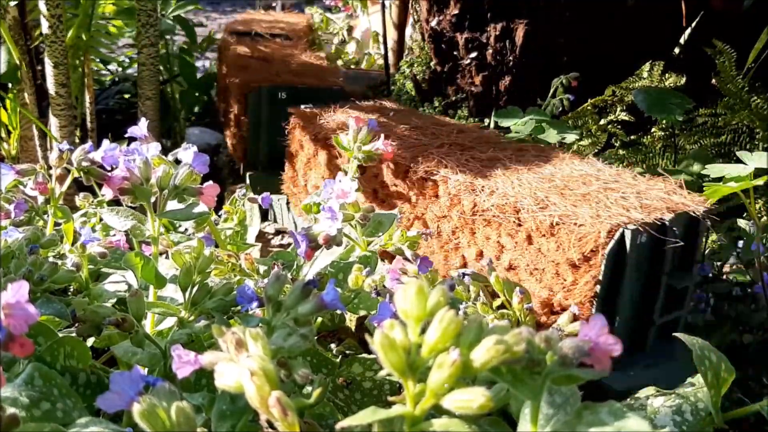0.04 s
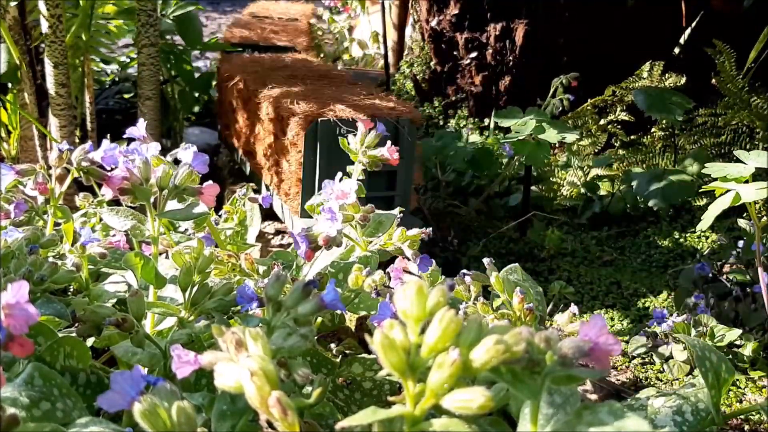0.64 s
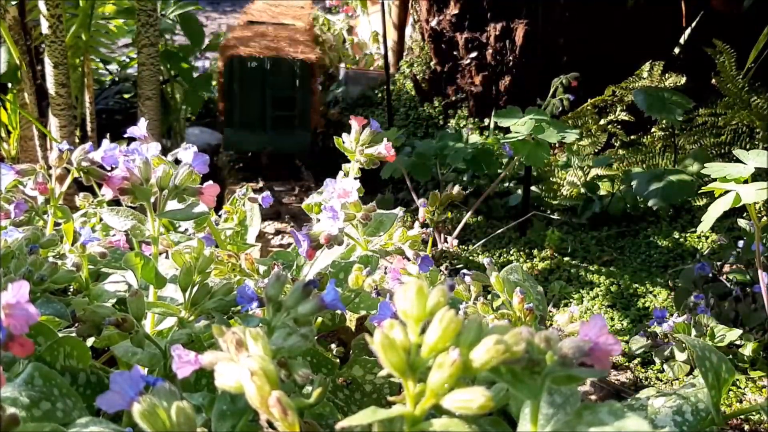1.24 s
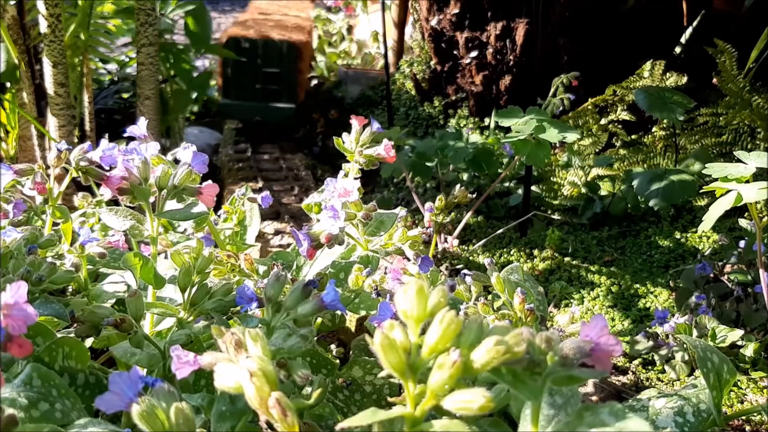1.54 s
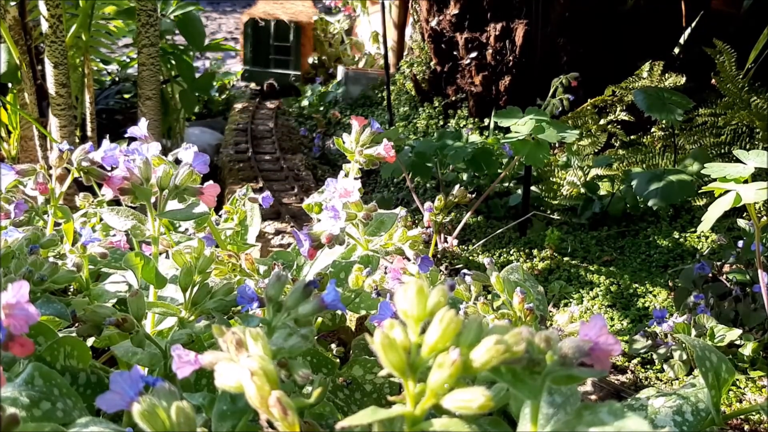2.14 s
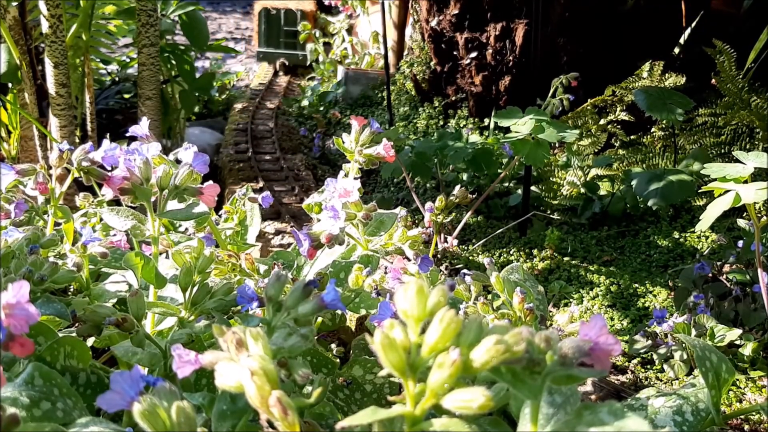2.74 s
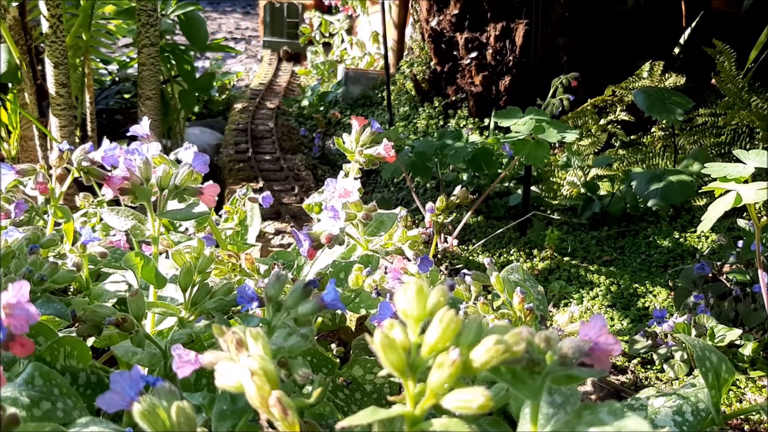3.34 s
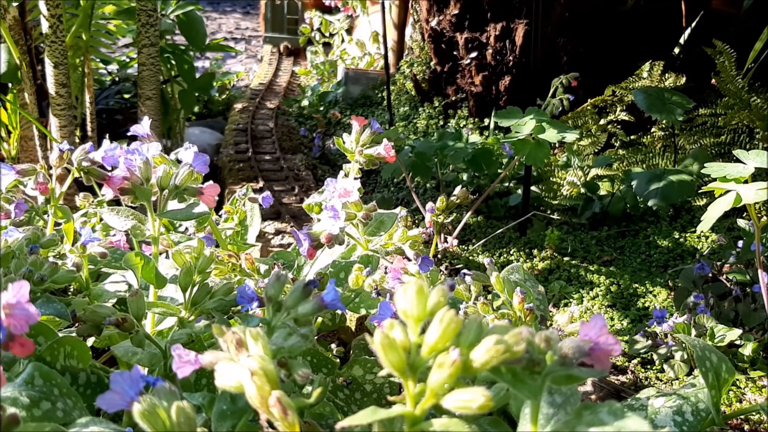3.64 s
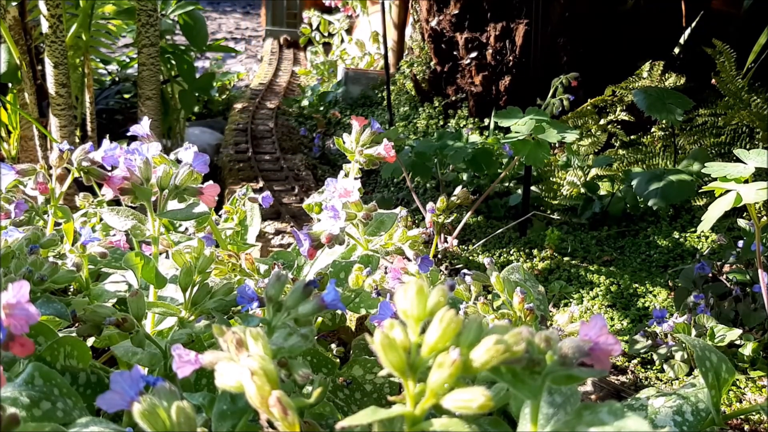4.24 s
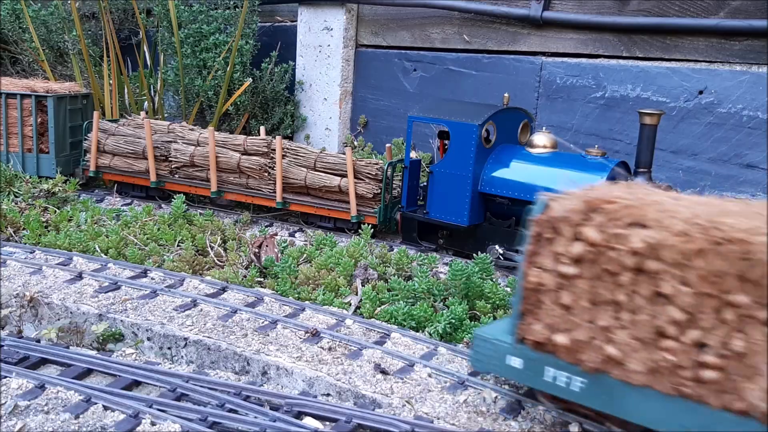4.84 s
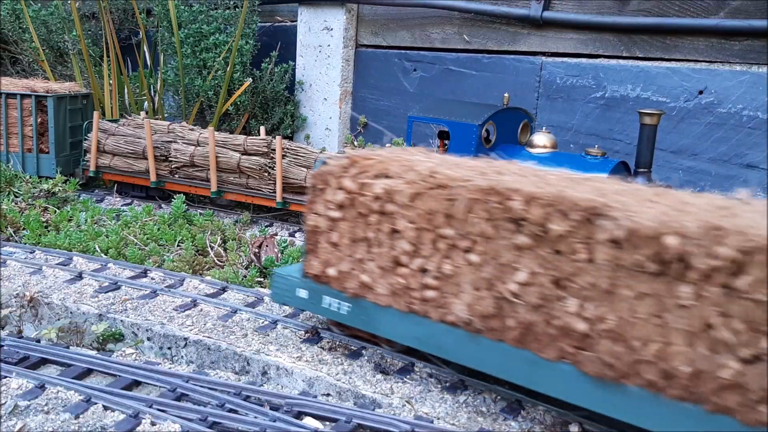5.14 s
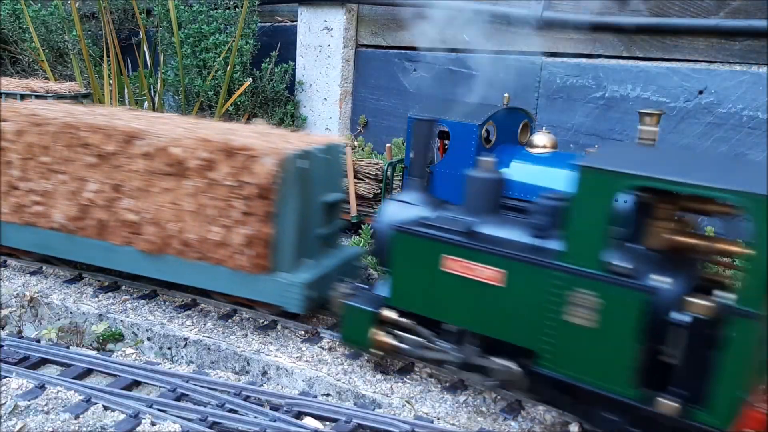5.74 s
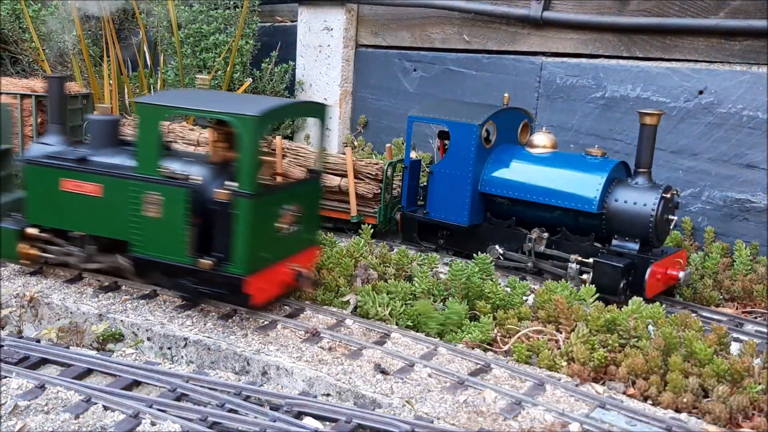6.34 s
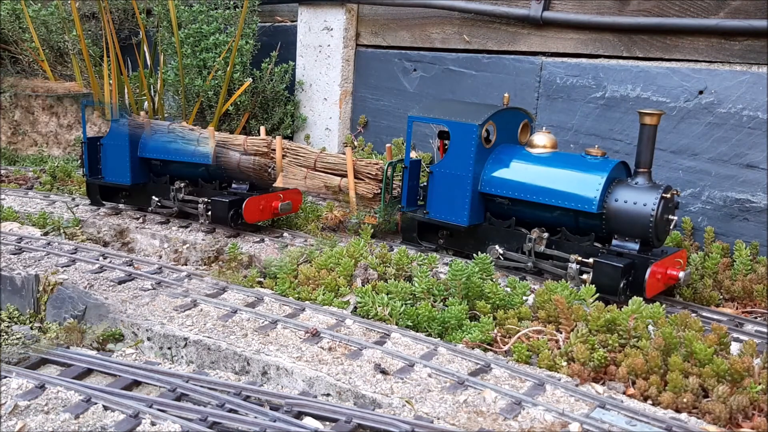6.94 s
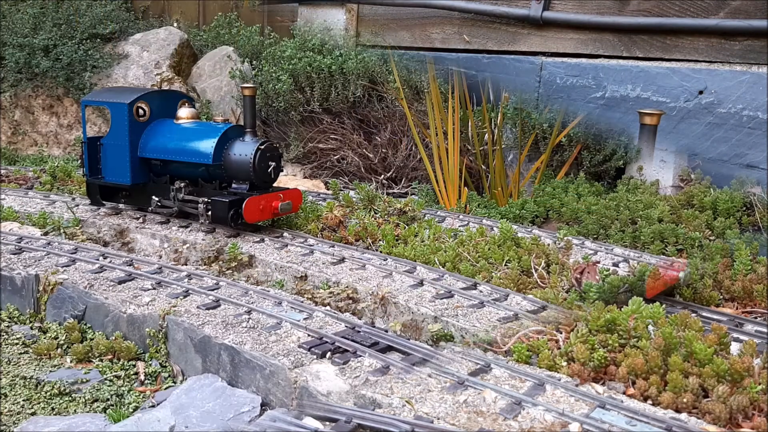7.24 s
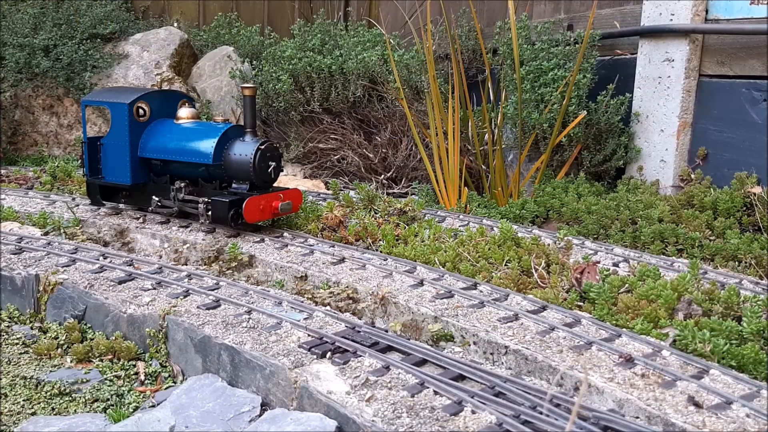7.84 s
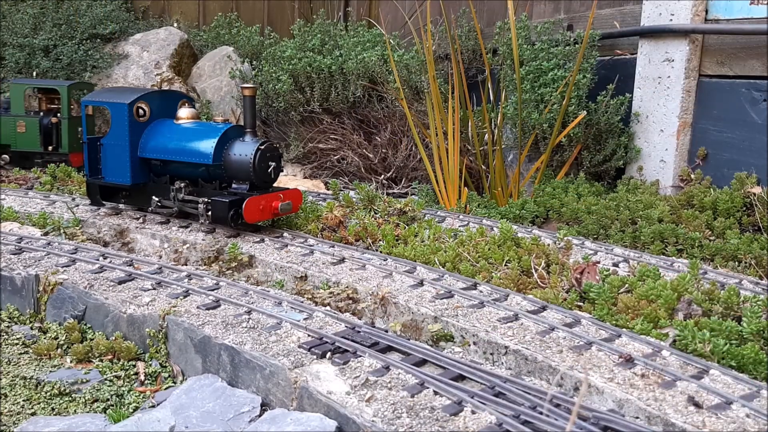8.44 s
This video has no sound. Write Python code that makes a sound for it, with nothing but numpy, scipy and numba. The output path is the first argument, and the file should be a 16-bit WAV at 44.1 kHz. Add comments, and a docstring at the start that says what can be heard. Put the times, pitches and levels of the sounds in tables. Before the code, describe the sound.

A small steam locomotive pulls wagons away through a garden, its quick hissing chuffs slowing and fading over rolling wheels and a hollow burner tone. Suddenly it is close and much louder, passing from right to left with brisk puffs, leaking steam, wheel roar and metallic clinks at the rail joints. It recedes and ends chuffing slowly in the distance, over a low outdoor rumble.

```python
"""A small live-steam locomotive chuffs away behind a flower bed, working a train of wagons round a garden
railway. Then the scene changes: it passes close, from right to left; in a last scene it labours in the
distance. Each beat is a puff of steam that rings the chimney and scatters off the garden; steam leaks in
between and the burner keeps the fire tube singing. Wheels roar on the rails and clink at the joints, over a low
outdoor rumble and a few puffs of wind."""
import sys
import numpy as np
from scipy import signal
from scipy.fft import rfft, irfft, next_fast_len
from scipy.io import wavfile
from scipy.ndimage import map_coordinates
from numba import njit

SR = 44100
rng = np.random.default_rng(int(sys.argv[2]) if len(sys.argv) > 2 else 0)


def unload_audio(sound):
    """Save the sound as a 16-bit wav file, at the path given as the first command line argument."""
    columns = np.transpose(np.atleast_2d(sound))
    # keep every value between -1 and 1, then stretch to whole-number steps
    steps = np.round(np.clip(columns, -1, 1) * 32767)
    wavfile.write(sys.argv[1], SR, steps.astype(np.int16))


N = 378819
TIME_S = np.arange(N) / SR
PASSING_S, DISTANT_S = 4.465, 7.85   # starts of the second and third stretch of the run

# Chimney resonances from behind and side-on. Each row: nominal pitch in Hz, width in Hz, relative dB.
CHIMNEY_BEHIND = [(1367, 250, -9.5), (2500, 244, -3), (2860, 320, -9.5), (4180, 510, 0), (7300, 610, -44),
                  (9280, 300, -15.5)]
CHIMNEY_SIDE = [(1415, 250, -14), (2545, 270, -1.5), (3150, 980, -19), (4267, 330, 2), (5930, 650, -21),
                (7060, 650, -14.5), (8930, 280, -15), (11140, 900, -22.5)]
# Chimney tuning, drifting with steam heat. Each row: time in seconds, Hz against CHIMNEY_NOMINAL_HZ.
CHIMNEY_TUNING = [(0, 4140), (1.2, 4270), (2.5, 4200), (4.8, 4291), (8.59, 4243)]
# Steam hiss spectrum. Each row: frequency in Hz, relative density in dB.
HISS_SPECTRUM = [(1200, -9), (2800, 8.5), (4700, 8), (6200, 1), (7600, 1), (8400, -4), (11000, 0),
                 (13500, -1.5), (16000, 0)]
CHIMNEY_NOMINAL_HZ, RING_LENGTH_SHARE = 4300, 0.86
CHIRP_SHARE, CHIRP_DELAY_S = 0.022, 0.0058


def exhaust(beats, leak_db, passing_on):
    """Each puff of steam hisses, rings the chimney and bends its pitch up; a weak leak runs between."""
    at_s, ring_db, hiss_db, length_s = beats.T
    spit = flutter(900, depth_db=1.5)   # wet steam leaves in lumps
    ring = spit * puffs(zip(at_s, ring_db, RING_LENGTH_SHARE * length_s), passing_on, 0.88, 0.69)
    hiss = spit * puffs(zip(at_s - .001, hiss_db, length_s), passing_on, 0.92, 1.16)
    leak = from_db(leak_db) * flutter(70, depth_db=1.5)
    waver = flutter(22, depth_db=.2)
    chirps = swells(zip(at_s + CHIRP_DELAY_S, np.zeros_like(at_s), length_s), rise=1.1, tail=1.1)
    bend = 1 + CHIRP_SHARE * (chirps - .5)
    tuning = waver * bend * in_time(CHIMNEY_TUNING)[0] / CHIMNEY_NOMINAL_HZ
    side_on = ramp(3.02, 2.16)   # the far curve turns the engine
    flow_behind = np.sqrt(1 - side_on) * np.hypot(ring * from_db(12), leak * from_db(-8))
    flow_side = np.sqrt(side_on) * np.hypot(ring * from_db(14.5), leak * from_db(5 * passing_on))
    chimney = pipe(flow_behind, CHIMNEY_BEHIND, tuning) + pipe(flow_side, CHIMNEY_SIDE, tuning)
    leak_hiss = leak * ((1 - passing_on) * from_db(-2.5) + passing_on * from_db(0.5))
    return chimney + np.hypot(hiss * from_db(0.5), leak_hiss) * noise(HISS_SPECTRUM)


def puffs(rows, passing_on, rise, tail):
    """Beat envelope; beats of the pass sound only once it has begun."""
    rows = np.array(list(rows))
    away = rows[:, 0] < PASSING_S
    return (1 - passing_on) * swells(rows[away], rise, tail) + passing_on * swells(rows[~away], rise, tail)


# Beats lengthen under load and shorten running free. Each row: time in seconds, length factor.
EFFORT = [(0, 1.11), (3, 0.96), (4.3, 0.91), (5.0, 1.2), (5.15, 0.84), (7.4, 1.2), (7.9, 0.99)]
BEAT_SPREAD_DB = 1.02


def valve_beats(speed, turn_start_s, phases, accents, blast, start_s, end_s):
    """Four beats a wheel turn. Each row: time in seconds, ring dB, hiss dB, length in seconds."""
    turns_per_s, = in_time(speed)
    turns = np.cumsum(turns_per_s) / SR
    turns -= np.interp(turn_start_s, TIME_S, turns)
    rows = []
    for turn in range(-1, int(turns[-1]) + 1):
        for phase, (ring_db, hiss_db, open_turns) in zip(phases, accents):
            at_s = np.interp(turn + phase, turns, TIME_S)
            if start_s < at_s < end_s:
                rows.append((at_s, ring_db, hiss_db, open_turns / np.interp(at_s, TIME_S, turns_per_s)))
    at_s, ring_db, hiss_db, length_s = np.transpose(rows)
    length_s *= np.interp(at_s, *np.transpose(EFFORT))
    blast_s, blast_ring_db, blast_hiss_db = np.transpose(blast)
    chance_db = BEAT_SPREAD_DB * rng.standard_normal((len(at_s), 2))
    ring_db += np.interp(at_s, blast_s, blast_ring_db) + chance_db[:, 0]
    hiss_db += np.interp(at_s, blast_s, blast_hiss_db) + chance_db[:, 1]
    return np.transpose([at_s, ring_db, hiss_db, length_s])


# Driving wheel speed. Each row: time in seconds, turns per second.
SPEED_AWAY = [(0.0, 3.436), (0.38, 3.871), (1.18, 4.498), (1.74, 4.501), (2.65, 3.546), (3.24, 2.585),
              (4.35, 1.834)]
SPEED_PASSING = [(4.47, 2.904), (4.75, 4.06), (4.95, 4.665), (5.75, 4.878), (5.77, 4.72), (6.55, 4.917),
                 (7.12, 4.545), (7.88, 4.921)]
SPEED_DISTANT = [(7.95, 2.55), (8.35, 2.45), (8.57, 2.1)]
# Accents of the four beats. Each row: ring in dB, hiss in dB, nominal length in turns.
ACCENTS_SLOW = [(-0.1, 0.9, 0.057), (-1.8, -2.4, 0.051), (0.5, 1.1, 0.058), (-1, -1, 0.063)]
ACCENTS_BRISK = [(-0.35, 0.31, .043), (.2, -.3, 0.046), (-.3, -0.9, 0.034), (0.65, 1, 0.04)]
# Exhaust strength. Each row: time in seconds, ring and hiss in relative dB.
BLAST_AWAY = [(0.0, -35.5, -42), (0.5, -33.5, -44.5), (0.65, -38.5, -46.5), (1.0, -37, -49),
              (1.802, -44, -54), (2.5, -49, -64), (3.15, -60.5, -68), (3.6, -56, -64.5), (4.3, -57, -64)]
BLAST_PASSING = [(4.47, -27, -28.5), (4.75, -18, -24.5), (5.27, -20, -30), (5.46, -26, -28),
                 (5.72, -24.5, -34), (6.2, -32, -38.5), (6.6, -31, -41.5), (6.92, -39.5, -41),
                 (7.82, -39.5, -47.5)]
BLAST_DISTANT = [(7.88, -47, -53.5), (8.2, -51.5, -60), (8.5, -46, -58)]
SLOW_TURNS, BRISK_TURNS = [0, .291, .6, .836], [0, .27, .532, .793]   # uneven beat phases


def run_beats():
    """Exhaust beats of the whole run: slow, brisk, slow."""
    return np.vstack([
        valve_beats(SPEED_AWAY, 0.024, SLOW_TURNS, ACCENTS_SLOW, BLAST_AWAY, 0, PASSING_S),
        valve_beats(SPEED_PASSING, 4.4717, BRISK_TURNS, ACCENTS_BRISK, BLAST_PASSING, PASSING_S, DISTANT_S),
        valve_beats(SPEED_DISTANT, 7.95, SLOW_TURNS, ACCENTS_SLOW, BLAST_DISTANT, DISTANT_S, TIME_S[-1])])


# Fire tube resonances from behind and side-on. Each row: nominal pitch in Hz, width in Hz, relative dB.
FLUE_BEHIND = [(369, 130, -6.5), (680, 166, -1.5), (1390, 340, -12), (2520, 240, -2)]
FLUE_SIDE = [(860, 180, -9.5), (1520, 200, -14.5), (2495, 227, -1.5), (4180, 270, -17)]
# Tube tuning, drifting with gas heat. Each row: time in seconds, pitch factor.
FLUE_TUNING = [(0, 1.01), (4.3, 0.98), (4.9, 0.97), (6.4, 1.017), (8.59, 0.99)]
# The tube sings out. Each row: centre in seconds, boost in dB, half length in seconds.
FLUE_SWELLS = [(3.0, 9.5, 0.6), (4.923, 7, 0.15), (6.98, 6, 0.54), (8.3, 5.5, 0.36)]


def fire_tube(beats, blast_db, passing_on):
    """The burner keeps the tube singing; each beat briefly draws it harder."""
    at_s, _, _, length_s = beats.T
    draught = swells(zip(at_s + 0.015, np.zeros_like(at_s), 1.3 * length_s), rise=1.0, tail=1.64)
    boost_db = sum(db * np.exp(-((TIME_S - mid_s) / half_s) ** 2) for mid_s, db, half_s in FLUE_SWELLS)
    level = from_db(blast_db + boost_db)
    tuning, = in_time(FLUE_TUNING)
    flow_behind = level * np.hypot(.5, draught) * (1 - passing_on) * from_db(-2.5)
    flow_side = level * np.hypot(.65, 1.18 * draught) * passing_on * from_db(3)
    return pipe(flow_behind, FLUE_BEHIND, tuning) + pipe(flow_side, FLUE_SIDE, tuning)


def pipe(flow, modes, tuning):
    """Turbulent gas rings a pipe; each resonance acts twice, leaving deep valleys."""
    gas = flow * noise([(200, 0), (16000, 0)])
    out = 0
    for hz, width_hz, db in modes:
        radius = np.exp(-np.pi * width_hz / SR)
        feedback = 2 * radius * np.cos(2 * np.pi * hz * tuning / SR)
        ring = [two_pole(two_pole(channel, feedback, radius), feedback, radius) for channel in gas]
        out = out + from_db(db) * np.array(ring)
    return out


# Wheel roar spectra along the run. Each row: frequency in Hz, relative density in dB.
ROLL_AWAY = [(120, -35), (200, -3.5), (296, -6.5), (365, 0), (540, 0.5), (680, 2), (1010, -2.5),
             (1330, 3.5), (1840, 1.5), (2200, 2.5), (2860, -3), (4840, -120)]
ROLL_CLOSE = [(120, -31), (200, -7), (248, -10.5), (475, -6.5), (624, -5.5), (820, 0.5), (1040, -1.5),
              (1520, 1), (1730, -5), (2270, -9.5), (2620, -11), (3400, -17.5), (4420, -13), (7480, -120)]
ROLL_LEAVING = [(120, -31), (200, -5), (273, -9), (344, -4), (568, -1.5), (857, 1), (1120, -7.5),
                (1320, -2), (2200, -10.5), (2860, -39), (4840, -120)]
ROLL_DISTANT = [(120, -31), (200, -24), (308, -15), (442, -0.5), (503, -5), (874, -10), (1220, -17),
                (1360, -6), (1690, -21), (2200, -23), (2860, -57), (4840, -120)]
# Wagon body resonances. Each row: pitch in Hz, width in Hz, relative level in dB.
WAGON_MODES = [(363, 110, -4.5), (878, 40, 2.5), (1050, 26, -11), (1513, 81, 1), (2123, 48, 4)]


def wheels(roar_db, passing_on, distant_on):
    """Rough treads roar on the rails, duller as they draw off, and jolt the loose wagon bodies."""
    gone = ramp(6.6, 0.98)
    away = from_db(-1.5) * (1 - passing_on) * noise(ROLL_AWAY)
    close = from_db(0.5) * np.sqrt(1 - gone) * noise(ROLL_CLOSE)
    leaving = from_db(-0.6) * np.sqrt(gone) * noise(ROLL_LEAVING)
    distant = from_db(3) * distant_on * noise(ROLL_DISTANT)
    roar = away + (passing_on - distant_on) * (close + leaving) + distant
    jolts = knocks(70, spread_db=4) * (1 + rng.standard_normal((2, N)) * 0.64)
    rattle = sum((-1) ** k * from_db(db + 27) * resonate(jolts, hz, width_hz)
                 for k, (hz, width_hz, db) in enumerate(WAGON_MODES))
    return from_db(roar_db) * (roar * flutter(120, depth_db=1.75) + rattle * (1 - distant_on))


# Wheel and coupling knocks. Each row: start in seconds, relative level in dB, favoured pitch in Hz.
CLINKS = [(0.451, -34, 4070), (1.903, -37.5, 4250), (2.572, -40, 2550), (4.468, -30, 4410),
          (4.5331, -23, 4250), (4.591, -18, 2450), (4.907, -22, 2560), (4.9212, -13.5, 4360),
          (4.9755, -12.5, 2600), (5.05, -17, 4300), (5.126, -21, 4280), (5.35, -27, 7000),
          (5.458, -18, 4300), (5.612, -25, 4220), (5.6232, -14, 3150), (5.632, -9.5, 5990),
          (5.757, -26, 4240), (5.8168, -15, 4350), (6.441, -27, 4230), (6.878, -33, 2550),
          (7.4996, -27, 4270)]
# Steel wheel resonances. Each row: pitch in Hz, relative level in dB, 60 dB decay time in seconds.
WHEEL_MODES = [(850, -24, 0.024), (1420, -8.5, 0.0025), (2914, -1.5, 0.015), (3720, -5.5, 0.0076),
               (5940, -9, 0.007), (7100, -8.5, 0.022), (7800, -11.5, 0.0042), (11100, -16, 0.0013),
               (14400, -16, .002)]


def clinks(roar_db, scrape_s=0.0031, favour_db=8):
    """A wheel drops at a joint: gritty contact favours some steel modes. Rods and chains tick between."""
    t = np.arange(SR // 20) / SR
    scrape = np.exp(-t / scrape_s)
    ticks = from_db(roar_db + 2.5) * knocks(22, spread_db=5)
    out = 0
    for hz, mode_db, t60_s in WHEEL_MODES:
        contact = np.zeros((2, N))
        for start_s, db, favoured_hz in CLINKS:
            i = round(start_s * SR)
            closeness = np.exp(-(np.log(hz / favoured_hz) / 0.095) ** 2)
            grit = scrape * rng.standard_normal((2, len(t)))
            contact[:, i:i + len(t)] += from_db(db - 18 + favour_db * closeness) * grit
        width_hz = np.log(1000) / np.pi / t60_s
        out = out + from_db(mode_db + 28) * resonate(contact + ticks, hz, width_hz)
    return out


# Engine direction in the pass. Each row: time in seconds, sine of the bearing (right positive).
BEARING_PASSING = [(4.47, 0.92), (4.95, 0.89), (5.3, 0.41), (5.7, 0.12), (6.2, -0.363), (6.8, -0.52),
                   (7.8, -0.82)]
BEARING_AWAY, BEARING_DISTANT = -0.11, -0.56
EAR_LAG_MS, EAR_SHADE_DB, LEAN_DB = 0.504, 5.5, -0.9
BLAST_FAR_DB, BLAST_CLOSE_DB = -39, -22.5
SCATTER_CLOSE_DB, SCATTER_FAR_DB, SCATTER_BED_DB = -10, -6, -2


def engine_position(blast_db, passing_on, distant_on):
    """Bearing sets pan and lag; a fainter engine counts as farther and is heard more by scatter."""
    in_pass = passing_on - distant_on
    bearing = (1 - passing_on) * BEARING_AWAY + distant_on * BEARING_DISTANT
    bearing += in_pass * in_time(BEARING_PASSING)[0]
    far = np.clip((BLAST_CLOSE_DB - blast_db) / (BLAST_CLOSE_DB - BLAST_FAR_DB), 0, 1)
    far_scatter_db = passing_on * SCATTER_FAR_DB + (1 - passing_on) * SCATTER_BED_DB
    scatter_db = (1 - far) * SCATTER_CLOSE_DB + far * far_scatter_db
    pan_db = in_pass * LEAN_DB - EAR_SHADE_DB * bearing
    return pan_db, EAR_LAG_MS * bearing, scatter_db


def garden_scatter(x, t60_s=0.2, lowpass_hz=9000, first_echo_s=0.0039):
    """Dense, short echoes off walls, stones and plants."""
    t = np.arange(SR // 2) / SR
    onset = np.clip(t / first_echo_s - 1, 0, 1)
    echoes = rng.standard_normal((2, len(t))) * from_db(-60 * t / t60_s) * onset
    echoes /= np.sqrt(np.sum(echoes ** 2, axis=1, keepdims=True))
    echoes = signal.sosfilt(signal.butter(1, lowpass_hz, fs=SR, output="sos"), echoes)
    return signal.fftconvolve(x, echoes, axes=1)[:, :N]


# Outdoor rumble and wind spectra. Each row: frequency in Hz, relative density in dB.
RUMBLE_SPECTRUM = [(15, -43), (25, -41), (50, 1.5), (70, 3.5), (145, 0.5), (249, -9.5), (300, -12),
                   (390, -8), (660, -120)]
WIND_SPECTRUM = [(20, -6), (45, 6), (75, 7.5), (120, -10), (250, -7.5), (500, -55)]
# Wind puffs. Each row: peak time in seconds, level in dB, nominal length in seconds.
GUSTS = [(.56, -55, 0.091), (.65, -52, .04), (.775, -48, 0.076), (2.2, -62, 0.08), (3.22, -60, 0.072),
         (3.36, -70, 0.037)]


def open_air(rumble_db):
    """Low outdoor rumble; gusts buffet the listener."""
    rumble = from_db(rumble_db + .5) * noise(RUMBLE_SPECTRUM)
    return rumble + swells(GUSTS, rise=1.07, tail=0.66) * noise(WIND_SPECTRUM)


# Left-right likeness of the noise. Each row: frequency in Hz, correlation from 0 to 1.
EAR_CORRELATION = [(20, .5), (60, .9), (130, .88), (300, .8), (640, .7), (1400, .5), (4200, .55),
                   (6500, .1), (16000, 0)]


def noise(spectrum):
    """Coloured stereo noise at rms 1, alike on both sides in the bass."""
    size = next_fast_len(N, True)
    hz = np.arange(size // 2 + 1) * SR / size
    mid, side = rfft(rng.standard_normal((2, size)))
    alike = at_hz(EAR_CORRELATION, hz)
    stereo = np.sqrt(1 + alike) * mid + np.sqrt(1 - alike) * side * [[1], [-1]]
    lowpass = 1 / np.hypot(1, (hz / spectrum[-1][0]) ** 2)
    highpass = 1 / np.hypot(1, (spectrum[0][0] / (hz + 1)) ** 2)
    x = irfft(stereo * lowpass * highpass * from_db(at_hz(spectrum, hz)), size)[:, :N]
    return x / np.sqrt(np.mean(x ** 2) + 1e-20)


def knocks(per_s, spread_db):
    """Random clicks, mostly small, a few large."""
    sizes = from_db(spread_db * np.minimum(rng.exponential(1, N), 3.5)) * rng.choice([-1, 1], N)
    return sizes * (rng.random(N) < per_s / SR)


def flutter(per_s, depth_db):
    """Randomly wandering gain."""
    knots = rng.standard_normal(N // 10)
    return from_db(depth_db * np.interp(TIME_S * per_s, np.arange(len(knots)), knots))


def swells(rows, rise, tail):
    """Burst envelopes summed in power; rise and tail scale the two flanks."""
    power = np.zeros(N)
    for peak_s, db, length_s in rows:
        i = np.arange(max(int((peak_s - 2 * length_s) * SR), 0), min(int((peak_s + 6 * length_s) * SR), N))
        offset = (i / SR - peak_s) / length_s * 2
        halvings = np.where(offset < 0, np.abs(offset / rise) ** 3, np.abs(offset / tail) ** 1.5)
        power[i] += from_db(db) ** 2 * .5 ** halvings
    return np.sqrt(power)


def resonate(x, hz, width_hz):
    """One resonance, peak gain 1."""
    radius = np.exp(-np.pi * width_hz / SR)
    poles = [1, -2 * radius * np.cos(2 * np.pi * hz / SR), radius ** 2]
    return signal.lfilter(np.array([1, 0, -1]) * (1 - radius ** 2) / 2, poles, x + 1e-18)


@njit
def two_pole(x, feedback, radius):
    """Resonance retuned every sample."""
    y = np.zeros(len(x))
    for i in range(2, len(x)):
        drive = (1 - radius ** 2) / 2 * (x[i] - x[i - 2])
        y[i] = drive + feedback[i] * y[i - 1] - radius ** 2 * y[i - 2] + 1e-18
    return y


def ear_delay(x, lag_ms):
    """Sound from one side reaches the far ear later."""
    i, half_lag = np.arange(N), lag_ms * SR / 2000
    return np.array([map_coordinates(x[0], [i - half_lag]), map_coordinates(x[1], [i + half_lag])])


def panned(x, pan_db):
    """Equal-power pan, left positive."""
    gains = from_db(np.array([pan_db, -pan_db]) / 2)
    return x * gains / np.sqrt(np.mean(gains ** 2, axis=0))


def from_db(db):
    """Decibels to gain."""
    return 10 ** (np.asarray(db) / 20)


def ramp(centre_s, length_s):
    """Linear step from 0 to 1."""
    return np.clip((TIME_S - centre_s) / length_s + .5, 0, 1)


def at_hz(points, hz):
    """Interpolate on a log-frequency axis."""
    knots_hz, values = np.transpose(points)
    return np.interp(np.log(hz + 1), np.log(knots_hz), values)


def in_time(rows):
    """Interpolate each column to every sample."""
    knots_s, *columns = np.transpose(rows)
    return [np.interp(TIME_S, knots_s, column) for column in columns]


def join_stretches(curves, passing_on, distant_on):
    """Join the away, passing and distant curves."""
    weights = 1 - passing_on, passing_on - distant_on, distant_on
    return sum(weight * in_time(rows) for weight, rows in zip(weights, curves))


# Levels along the run. Each row: time in seconds, then wheel roar, steam leak and rumble in relative dB.
MIX_AWAY = [(0, -53, -50, -71.5), (.55, -50, -52.5, -68), (.9, -50.5, -53.5, -69), (1.9, -56, -55, -71.5),
            (3.09, -70.5, -65.5, -74), (4.1, -81.5, -72.5, -77), (4.42, -83, -72, -75)]
MIX_PASSING = [(4.5, -42, -62, -47.5), (4.7, -40, -44, -47.5), (5.05, -37.5, -42.5, -48),
               (5.58, -35.5, -42.5, -50), (5.97, -38, -48.5, -52.5), (7.18, -47, -51, -48.5),
               (7.82, -49.5, -52, -52)]
MIX_DISTANT = [(7.88, -58, -63, -54.5), (8.57, -60.5, -69.5, -51.5)]


def scene():
    """Engine, wheels and open air over the three stretches of the run."""
    passing_on, distant_on = ramp(PASSING_S, .002), ramp(DISTANT_S, .012)   # both stay at 1 to the end
    roar_db, leak_db, rumble_db = join_stretches((MIX_AWAY, MIX_PASSING, MIX_DISTANT), passing_on, distant_on)
    blast_db = join_stretches((BLAST_AWAY, BLAST_PASSING, BLAST_DISTANT), passing_on, distant_on)[0]
    pan_db, lag_ms, scatter_db = engine_position(blast_db, passing_on, distant_on)
    beats = run_beats()
    engine = exhaust(beats, leak_db, passing_on) + clinks(roar_db) + fire_tube(beats, blast_db, passing_on)
    engine = panned(ear_delay(engine, lag_ms) + garden_scatter(engine * from_db(scatter_db)), pan_db)
    rolling = panned(wheels(roar_db, passing_on, distant_on), 0.19 * pan_db)   # spread along the train
    return engine + rolling + open_air(rumble_db)


def record(dry):
    """Steep low-pass on the top treble."""
    cutoff_hz = 15850
    return signal.sosfilt(signal.ellip(12, .1, 70, cutoff_hz, fs=SR, output="sos"), dry)


dry = scene()
out = record(dry)
unload_audio(out)
```